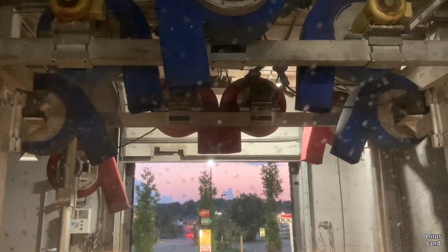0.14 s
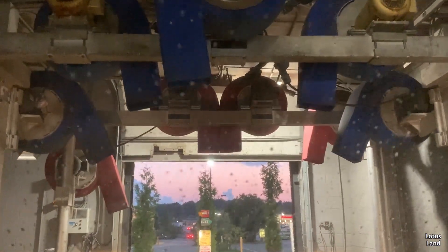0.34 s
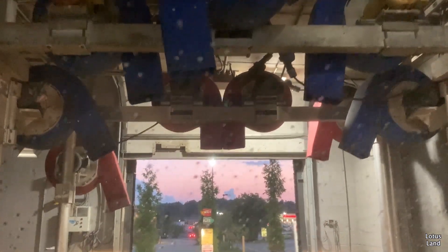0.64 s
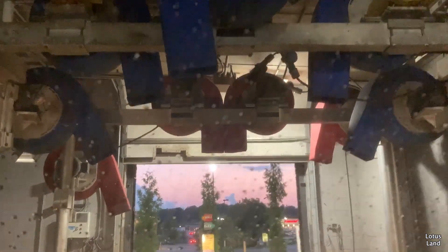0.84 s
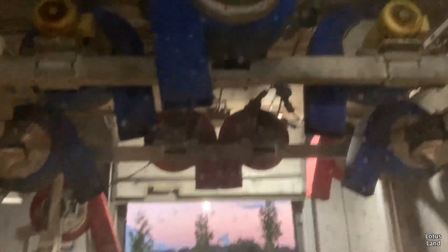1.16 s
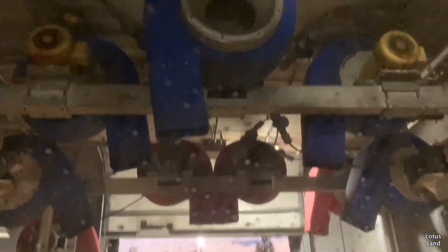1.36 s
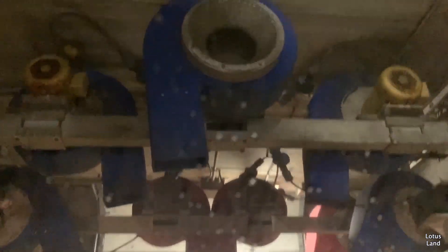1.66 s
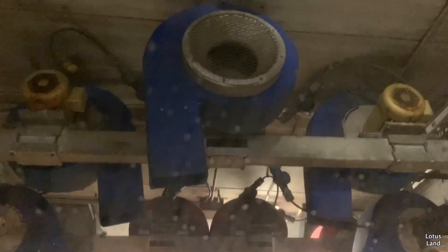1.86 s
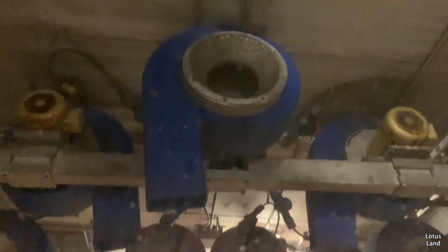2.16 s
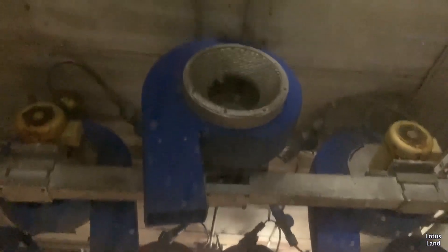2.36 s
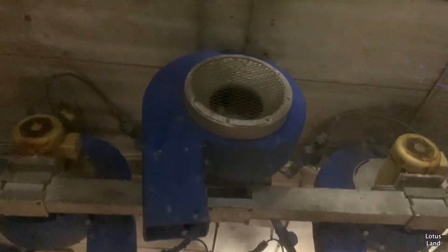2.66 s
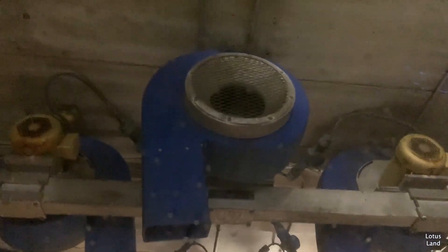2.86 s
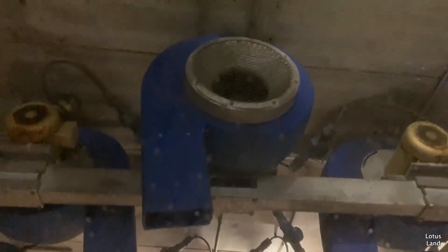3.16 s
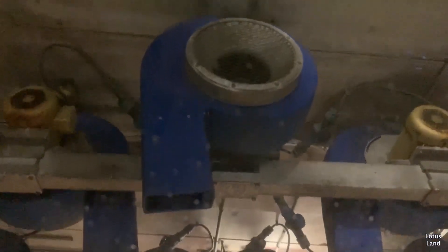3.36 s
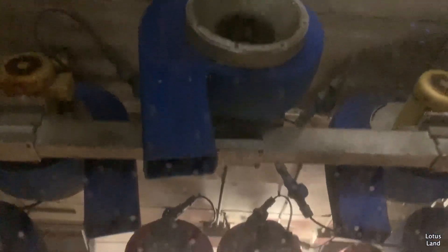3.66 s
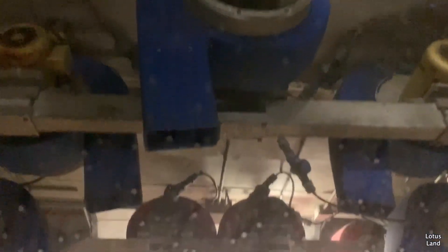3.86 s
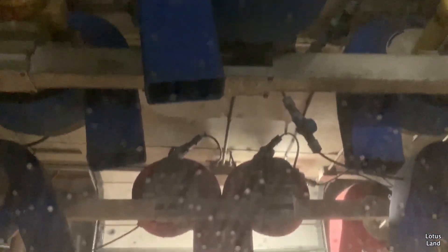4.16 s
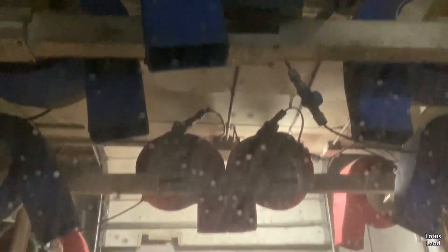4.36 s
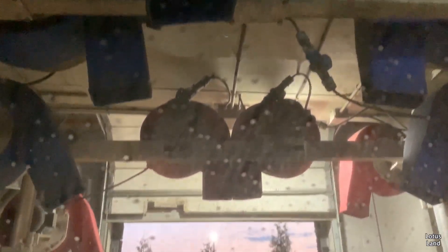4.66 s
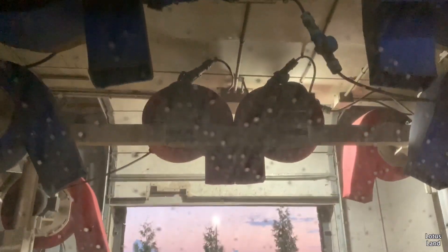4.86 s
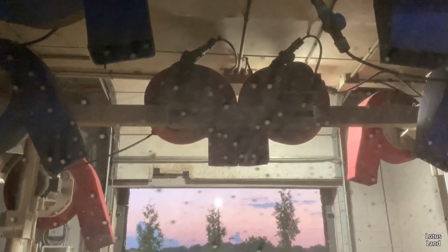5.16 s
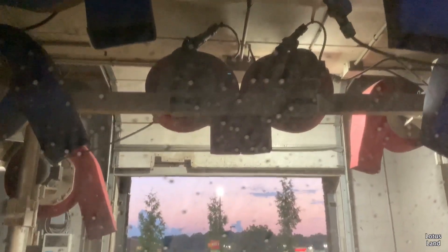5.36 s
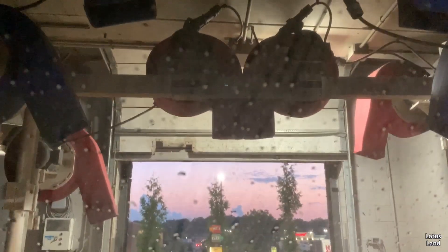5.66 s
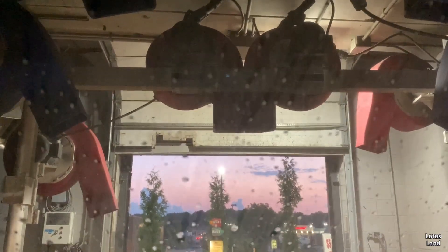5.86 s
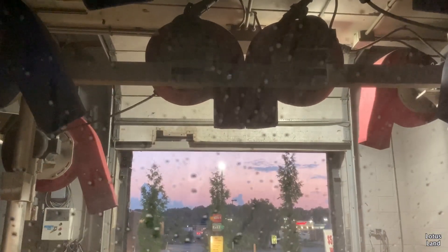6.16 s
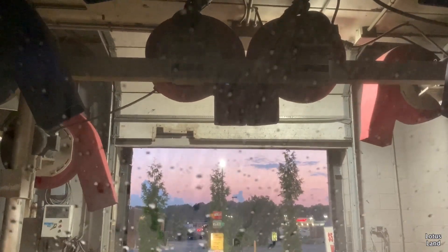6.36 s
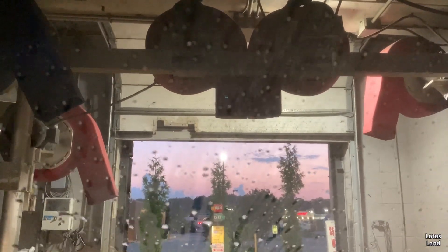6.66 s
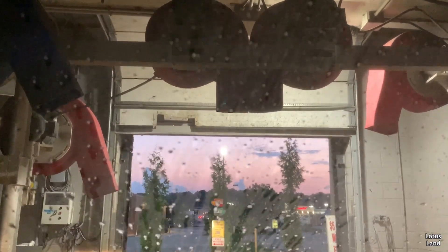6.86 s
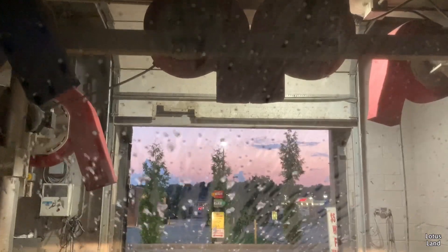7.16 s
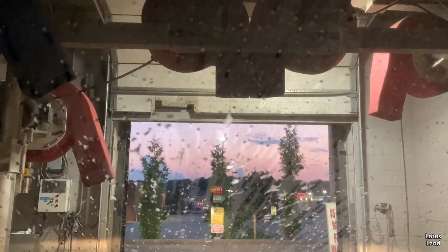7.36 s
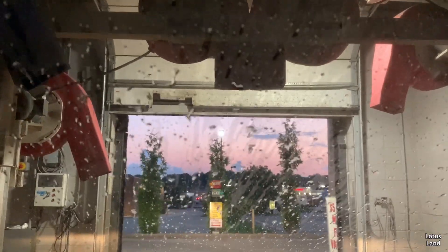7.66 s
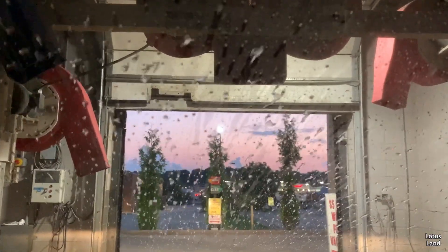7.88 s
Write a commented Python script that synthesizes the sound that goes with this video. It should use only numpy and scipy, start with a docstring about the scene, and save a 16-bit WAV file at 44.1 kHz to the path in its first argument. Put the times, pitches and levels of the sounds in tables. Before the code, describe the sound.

From inside a closed car, the blowers of a drive-through wash make a loud, continuous low roar. Air rushes against the windows close by, with a few soft spatters of water early on. The cabin booms more strongly for a couple of seconds, then settles. Behind it, distant fans hold a faint steady note as others whine upward, and the rush builds again in the last second or so.

```python
"""Air dryers roar over a car in a wash tunnel, heard from inside the closed cabin on a handheld phone.
The jets shake the body panels, and the cabin booms while the phone points up at the roof.
Air rushes and spray spatters on the glass close by; near the end a jet reaches the windscreen.
Further off, blade tones sing faintly: one bank of fans at full speed, more running up."""
import sys
import numpy as np
from scipy import signal
from scipy.fft import rfft, irfft, next_fast_len
from scipy.io import wavfile
from scipy.ndimage import uniform_filter1d, minimum_filter1d, map_coordinates

SR = 44100
rng = np.random.default_rng(int(sys.argv[2]) if len(sys.argv) > 2 else 0)


def put_to_file(sound):
    """Save the sound as 16-bit audio at rate SR, in the file named by the first command-line argument."""
    columns = np.atleast_2d(sound).T  # one column per channel
    safe = np.clip(columns, -1, 1)
    whole_steps = np.round(safe * 32767)
    wavfile.write(sys.argv[1], SR, whole_steps.astype(np.int16))


N = 353682
TIME_S = np.arange(N) / SR


def amp(db):
    """Decibels to gain."""
    return 10 ** (np.asarray(db) / 20)


def unit(x):
    """Scaled to rms 1."""
    return x / np.sqrt(np.mean(x ** 2) + 1e-20)


def along(points, hz):
    """The value at hz of a curve through (hz, value) points on a log axis."""
    point_hz, values = np.transpose(points)
    return np.interp(np.log(hz + 1), np.log(point_hz + 1), values)


def ramp(start_s, end_s):
    """A straight line from 0 at start_s to 1 at end_s, flat beyond both."""
    return np.clip((TIME_S - start_s) / (end_s - start_s), 0, 1)


def arch(start_s, length_s):
    """One half-sine swell and fade."""
    return np.sin(np.pi * ramp(start_s, start_s + length_s))


def wobble(rate_hz):
    """A smooth random curve with rate_hz knots a second."""
    knots = rng.standard_normal(int(N * rate_hz / SR) + 4)
    return map_coordinates(knots, [TIME_S * rate_hz])


def filtered(x, response):
    """x through a filter whose gain is response(hz)."""
    size = next_fast_len(N + SR // 2)
    return irfft(rfft(x, size) * response(np.fft.rfftfreq(size, 1 / SR)), size)[..., :N]


def shaped(points):
    """A broad colour through (freq_hz, level_db) points."""
    return lambda hz: amp(along(points, hz))


def ringing(modes):
    """A colour of steep-sided resonances: pitch_hz, width_hz, level_db."""
    return lambda hz: np.sqrt(sum(amp(2 * db) / (1 + (2 * (hz - pitch_hz) / width_hz) ** 6)
                                  for pitch_hz, width_hz, db in modes))


def level(layer):
    """A layer's dB as the phone tips up to the roof and back, and a jet reaches the windscreen."""
    # Each layer at the microphone: before_db, up_db, after_db, rise_s, full_s, fall_s, settled_s, jet_db
    turn = {"shake": (-21.5, -23.5, -18.5, 1, 2, 4, 4.5, 3),
            "low boom": (-17, -13, -19, 1.43, 2, 3.5, 5.5, 1.5),
            "high boom": (-23.5, -14, -20, 0, 1.77, 3.5, 4.5, -0.4),
            "roar": (-25, -24, -28.5, 0.6, 2, 3, 4, 5.5), "roof": (-27, -23, -28.5, 0.96, 2, 3, 4.5, 1),
            "bass left-right": (-1, -1.5, -1.4, 0.7, 2, 3, 4, 0.5),
            "rush": (-31, -31.5, -31.5, .5, 2.5, 6.5, 2.5, 2), "hiss": (-42, -41, -40, 1, 6.5, 4, 8.5, 1),
            "fizz": (-53.5, -53.7, -53.3, 0, -1.7, 0.5, 4, 0), "top": (-62, -60, -72, .8, 1, 2.5, 3.2, 0),
            "blades": (-41.5, -39.5, -43, 0.5, -0.5, 5, 6, 6)}
    before_db, up_db, after_db, rise_s, full_s, fall_s, settled_s, jet_db = turn[layer]
    tip_up = (up_db - before_db) * ramp(rise_s, full_s)
    tip_down = (after_db - up_db) * ramp(fall_s, settled_s)
    return before_db + tip_up + tip_down + jet_db * ramp(6.66, 7.28)


def air(colour, patchy_db, lag_s=0):
    """Patchy turbulence; the two microphone ports hear the bass alike, the treble apart."""
    # Likeness of the left and right ports: freq_hz, correlation
    likeness = [(30, 0.98), (60, 0.95), (130, 0.98), (210, 0.92), (280, 0.71), (400, 0.53), (520, 0.38),
                (650, 0.24), (1300, 0.24), (3000, 0.056), (6000, 0.11), (13000, 0.041)]
    noise = signal.stft(rng.standard_normal((2, N)), nperseg=1024)[2]

    def patches(bins, frames):
        across_pitch = uniform_filter1d(rng.standard_normal(noise.shape[1:]), bins, axis=0)
        return unit(uniform_filter1d(across_pitch, frames, axis=1))

    def mid_side(hz):
        angle = np.arccos(np.clip(along(likeness, hz), -1, 1)) / 2
        return colour(hz) * [np.cos(angle), np.sin(angle)]

    field = .6 * patches(12, 7) + patches(2, 13)  # short wide puffs, long narrow bands
    patchy = signal.istft(noise * amp(patchy_db * field), nperseg=1024)[1][:, :N]
    mid, side = filtered(patchy, mid_side)
    return unit(np.array([mid + side, np.roll(mid - side, round(lag_s * SR))]))


def tone(hz, db, lead_rad, waver_db):
    """A slightly unsteady fan tone; tunnel echoes make it swell and fade apart at each port."""
    phase = 2 * np.pi * np.cumsum(hz * (1 + .002 * wobble(10))) / SR
    swell = amp(db + waver_db * np.array([wobble(7), wobble(6)]))
    return np.sqrt(2) * swell * np.sin([phase + lead_rad, phase])


def flickers(count=320, half_length_s=.055, max_climb_per_s=.04):
    """Faint brief tones creep upwards at random pitches and places, thickening as more fans run up."""
    # Typical strength of a flicker: pitch_hz, level_db
    strength = [(700, -44), (1300, -49), (2500, -52.5), (4200, -58)]
    low_hz, high_hz = strength[0][0], strength[-1][0]
    out = np.zeros((2, N + SR))
    t = np.arange(-SR // 4, SR // 4) / SR
    envelope = np.exp(-(t / half_length_s) ** 2)
    for when, pitch, climb, size, side, lead in rng.random((count, 6)):
        hz = low_hz * (high_hz / low_hz) ** pitch
        phase = 2 * np.pi * hz * (t + max_climb_per_s * climb * t ** 2 / 2)
        gain = amp(along(strength, hz) + 8 * (size - .5) + 8 * (side - .5) * np.array([[1], [-1]]))
        start = round(when ** .75 * N)
        out[:, start:start + len(t)] += gain * envelope * np.sin([phase + 2 * np.pi * lead, phase])
    return out[:, SR // 4:][:, :N]


def motor_whines():
    """Other motors out in the tunnel whine briefly, some still climbing."""
    # Motor whines: start_s, length_s, pitch_hz, climb_hz_per_s, left_lead_rad, level_db
    whines = [(2.1, 2.3, 1105, 125, 2, -51), (5.9, .9, 2255, 8, 2, -56), (6.9, 1, 2508, -8, 1, -55),
              (6.9, 1.3, 2906, -8, 2, -55.5), (6.8, 1.4, 3004, 10, 1, -62)]
    return sum(arch(start_s, length_s) * tone(hz + climb * (TIME_S - start_s), db, lead, waver_db=4)
               for start_s, length_s, hz, climb, lead, db in whines)


def fans():
    """Blade tones from the tunnel: a bank at full speed, a pair nearing it, a last fan climbing."""
    # Fans of nearly equal speed blur into narrow bands: pitch_hz, width_hz, level_db
    blade_bands = [(518, 12, 0), (1034, 22, -19), (2065, 26, -24)]
    # Tones of the pair running up: final_hz, fan_index, left_lead_rad, level_db
    pair_tones = [(625.5, 0, -2, -45), (1259, 1, 1.6, -55), (1533, 1, 3, -64), (1840, 1, 2.8, -62),
                  (1657, 1, .4, -75), (2092, 1, 2, -66)]
    # Moments when a tone stands out: tone_index (0-5 pair, 6 last fan, 7 bank), at_s, half_s, gain_db
    swells = [(0, 3.6, .4, 5), (0, 4.7, .3, 4), (0, 5.6, .6, 6.5), (0, 7.3, .5, 1), (1, 3.18, .14, 17),
              (1, 3.38, .09, 12), (1, 3.9, .15, 5), (1, 4.65, .15, 4), (1, 5.6, .4, 6), (1, 6.75, .3, 8),
              (1, 7.6, .45, 8), (2, 4.3, .4, 11), (2, 5.6, .8, 16), (2, 6.4, .4, 12), (2, 7.4, .5, 10),
              (3, 5.7, .45, 8), (3, 7.2, .7, 7), (4, 3.33, .12, 28), (5, 4.05, .2, 11), (5, 4.65, .22, 13),
              (5, 5.08, .18, 14), (5, 5.8, .2, 8), (6, 4.8, .12, 8), (6, 5.3, .15, 9), (6, 5.7, .25, 13),
              (6, 6.05, .12, 10), (6, 7.2, .12, 14), (6, 7.4, .1, 11), (7, .65, .25, 2.5),
              (7, 4.8, .25, 4.5), (7, 7.35, .3, 2)]

    def swell_db(which):
        return sum(gain_db * np.exp(-((TIME_S - at_s) / half_s) ** 2)
                   for index, at_s, half_s, gain_db in swells if index == which)

    bank_db = level("blades") + swell_db(7)
    bank = amp(bank_db - 1) * air(ringing(blade_bands), patchy_db=5)
    # The two nearest fans beat as one sags in pitch.
    steady = tone(np.full(N, 519.5), bank_db - 2, lead_rad=-.2, waver_db=2)
    sagging = tone(517.5 - 2.5 * ramp(2.5, 4.2), bank_db - 2, lead_rad=-.2, waver_db=2)
    # The pair starts 20% short of full speed and closes in on it ever more slowly.
    shortfall = [.2 / (1 + np.exp((TIME_S - halfway_s) / settle_s))
                 for halfway_s, settle_s in [(3.15, .72), (3.2, .62)]]
    pair = sum(tone(final_hz * (1 - shortfall[fan]), db + swell_db(index), lead, waver_db=2.2)
               for index, (final_hz, fan, lead, db) in enumerate(pair_tones))
    pair_s, last_s, emerge_s, climb_hz_per_s = 2.8, 4.5, .34, 185
    last_hz = np.abs(812 + climb_hz_per_s * (TIME_S - last_s))
    last = tone(last_hz, -62 + swell_db(6), lead_rad=1.4, waver_db=2.5)
    running_up = pair * ramp(pair_s, pair_s + emerge_s) + last * ramp(last_s, last_s + emerge_s)
    return bank + steady - sagging + running_up


def resonances():
    """Narrow bands of air noise come and go as the phone turns; the low ones lean like the boom."""
    # Passing resonances: start_s, length_s, pitch_hz, width_hz, level_db
    bands = [(0, 0.74, 1400, 57, -47), (0.1, 0.8, 1100, 80, -46), (0.5, 0.68, 1250, 60, -51),
             (1.2, 0.76, 216, 17, -18.5), (1.1, .7, 1575, 70, -48), (1.4, .9, 1620, 90, -47),
             (1, 3.4, 740, 200, -41), (1, 0.59, 391, 25, -31), (1.5, 1.04, 146.6, 16, -13.5),
             (2, 0.79, 153, 13.4, -14), (2, 0.8, 180, 15, -16.5), (3.7, .9, 140, 35, -19),
             (2.5, 1.2, 1580, 90, -50), (2, 1.33, 385, 29, -25), (5.3, 0.92, 460, 27, -33),
             (5.5, 1.63, 288, 79, -30), (6.9, 1.8, 565, 28, -36.5), (6.2, 1.25, 1067, 54, -42.5),
             (6.8, 1, 1350, 62, -43), (6.1, 0.64, 1510, 60, -49), (5.5, 0.43, 2370, 50, -52),
             (5, .5, 1840, 40, -51), (6.6, .5, 2070, 70, -51), (7, .8, 3100, 60, -52),
             (7, 1.1, 910, 150, -45)]
    out = np.zeros((2, N))
    for start_s, length_s, hz, width_hz, db in bands:
        pan = amp(level("bass left-right") * (hz < 250) * [[.5], [-.5]])
        out += amp(db) * arch(start_s, length_s) * pan * air(ringing([(hz, width_hz, 0)]), patchy_db=.5)
    return out


def windows(right_lag_s=.00032):
    """Air tears past the glass nearer the left port; small gusts and spray flutter the hiss."""
    # Air on the glass, from midrange rush to thinnest hiss, each: freq_hz, density_db
    rush_spectrum = [(300, -120), (440, -47.5), (500, 2.5), (560, -4), (600, -4), (700, -3), (830, -7.5),
                     (900, -10.5), (970, -9), (1100, -11), (1320, -15), (1570, -14), (1800, -20),
                     (2100, -52), (3500, -120)]
    hiss_spectrum = [(900, -120), (1400, -49), (1800, -2), (2400, -2.5), (2750, -3), (3050, -3.5),
                     (3800, -8), (5000, -11.5), (6300, -12.5), (7200, -15.5), (8500, -55.5), (12000, -120)]
    fizz_spectrum = [(4500, -120), (6500, -30), (7500, 1), (8200, 1.5), (9000, -2), (10500, 0),
                     (11500, -14.5), (13000, -7), (14500, -8)]
    top_spectrum = [(9000, -120), (12000, -10), (13000, 0.5), (14500, -3)]
    # Blown water spatters on the glass: at_s, half_s, gain_db
    spray = [(.135, .012, 5), (.455, .02, 2.5), (.68, .02, 2.5), (1.07, .02, 3), (1.13, .025, 2.5),
             (1.24, .05, 2.5), (1.38, .025, 3), (1.686, .04, 2), (1.96, .02, 0.5)]
    # The patches in the rush are wavering duct resonances.
    rush = amp(level("rush")) * air(shaped(rush_spectrum), patchy_db=1.6, lag_s=right_lag_s)
    spatter_db = sum(db * np.exp(-((TIME_S - at_s) / half_s) ** 2) for at_s, half_s, db in spray)
    gusts_db = .6 * wobble(9) + spatter_db
    hiss_db = level("hiss") + [[.25], [-.25]] + .35 * gusts_db
    hiss = amp(hiss_db) * air(shaped(hiss_spectrum), patchy_db=1.2, lag_s=right_lag_s)
    fizz_db = level("fizz") + [[-.8], [.8]] + .5 * wobble(14) + gusts_db
    fizz = amp(fizz_db) * air(shaped(fizz_spectrum), patchy_db=.7)
    top = amp(level("top") + gusts_db) * air(shaped(top_spectrum), patchy_db=.7)
    return rush + hiss + fizz + top


def car_body():
    """The jets shake the panels and drive the cabin's air modes; the phone moves through loud spots."""
    # Shaking body panels: freq_hz, density_db
    shake_spectrum = [(10, -120), (15, -50), (25, -4.5), (42, 8), (58, 14), (82, 13.5), (98, 13.5),
                      (110, 7.5), (135, -39), (250, -120)]
    # Low and higher air modes of the cabin: pitch_hz, width_hz, level_db
    low_modes = [(120.8, 30, 0), (130, 31, -1.5), (150.4, 24.4, 1)]
    high_modes = [(178, 20, -.5), (203.5, 44.5, -5)]
    # Modes of the door and floor panels, and of the roof sheet: pitch_hz, width_hz, level_db
    door_floor_modes = [(247, 42, -1.5), (290.5, 61, -2)]
    roof_modes = [(348, 35, -2), (383.2, 48, -0.5), (440, 49, -2), (477, 40, -6.5)]
    shake = amp(level("shake")) * air(shaped(shake_spectrum), patchy_db=-.14)
    low_boom = amp(level("low boom")) * air(ringing(low_modes), patchy_db=.63)
    high_boom = amp(level("high boom")) * air(ringing(high_modes), patchy_db=.5)
    roar = amp(level("roar")) * air(ringing(door_floor_modes), patchy_db=1.2)
    roof = amp(level("roof")) * air(ringing(roof_modes), patchy_db=.9)
    bass_pan = amp(level("bass left-right") * [[.5], [-.5]])
    return bass_pan * (shake + low_boom + high_boom) + amp([[-.4], [.4]]) * (roar + roof)


def scene():
    """Everything that reaches the microphone in the cabin."""
    return car_body() + windows() + fans() + motor_whines() + resonances() + flickers()


def record(dry):
    """The phone's limiter ducks the bass on the highest peaks; nothing is kept above the band limit."""
    ceiling, hold_s, bass_hz, band_limit_hz = .88, .012, 450, 14325
    hold = round(hold_s * SR)
    bass = filtered(dry, lambda hz: 1 / (1 + (hz / bass_hz) ** 4))
    needed_gain = np.minimum(1, ceiling / (np.abs(dry).max(axis=0) + 1e-9))
    held_gain = minimum_filter1d(needed_gain, 2 * hold)
    gain = uniform_filter1d(uniform_filter1d(held_gain, hold), hold)
    return filtered(dry - (1 - gain) * bass, lambda hz: hz < band_limit_hz)


dry = scene()
out = record(dry)
put_to_file(out)
```